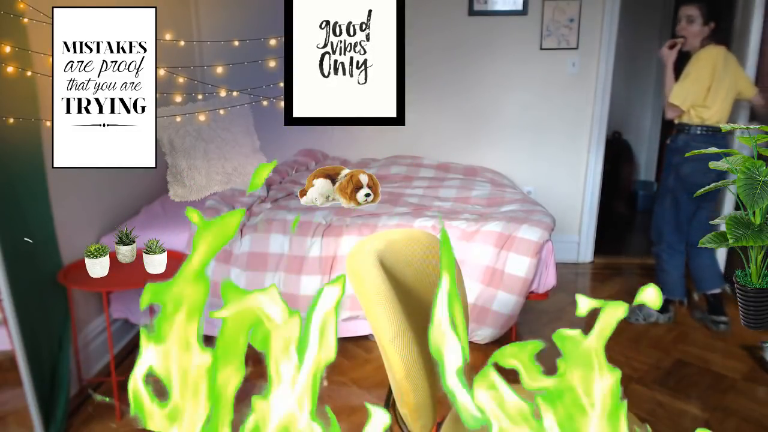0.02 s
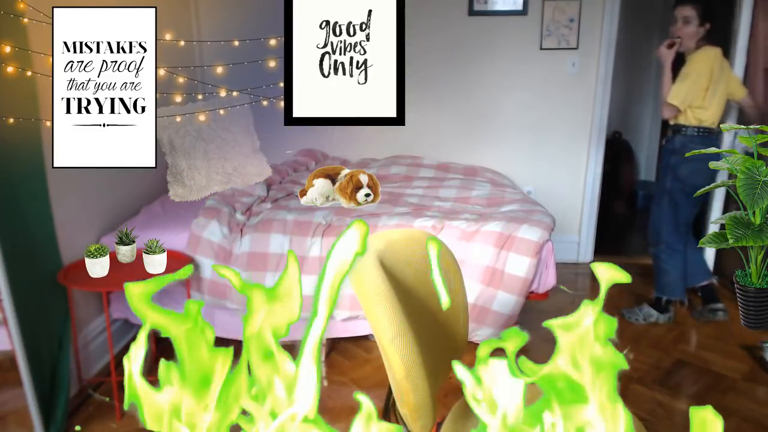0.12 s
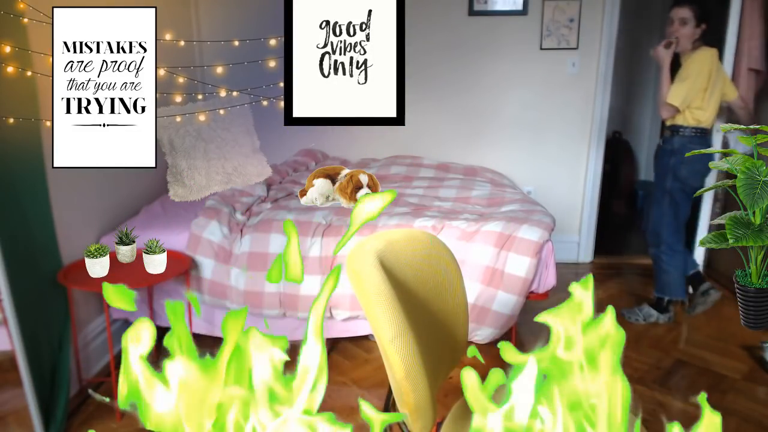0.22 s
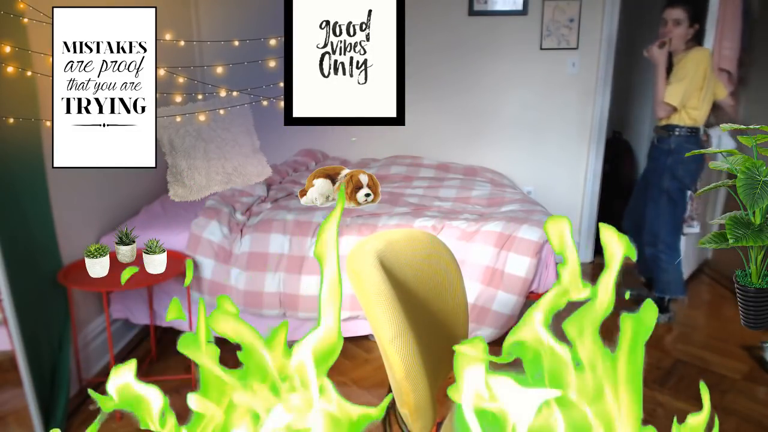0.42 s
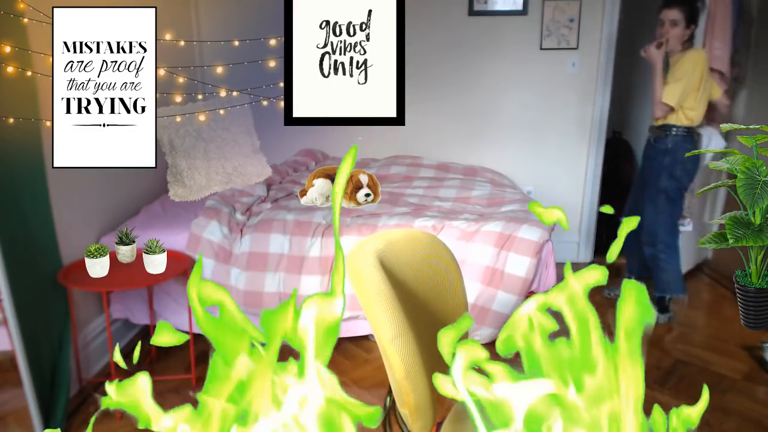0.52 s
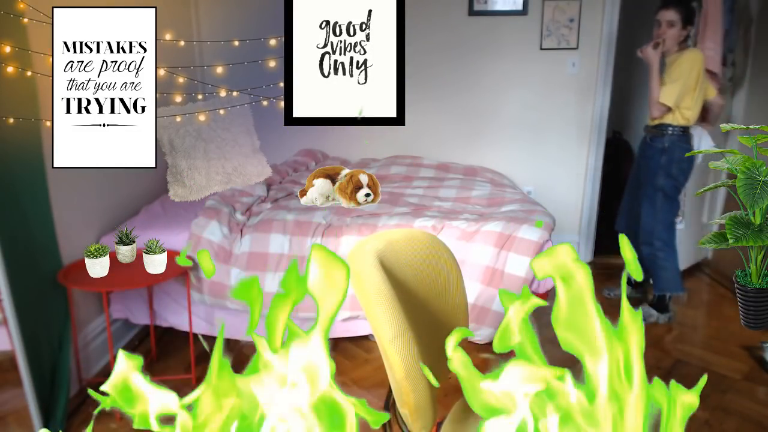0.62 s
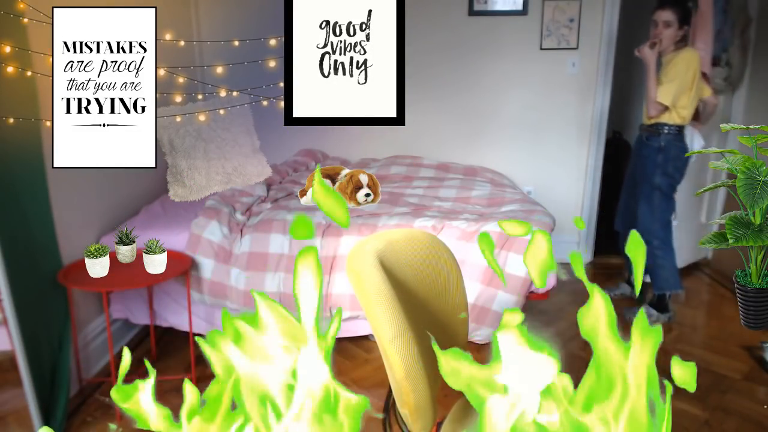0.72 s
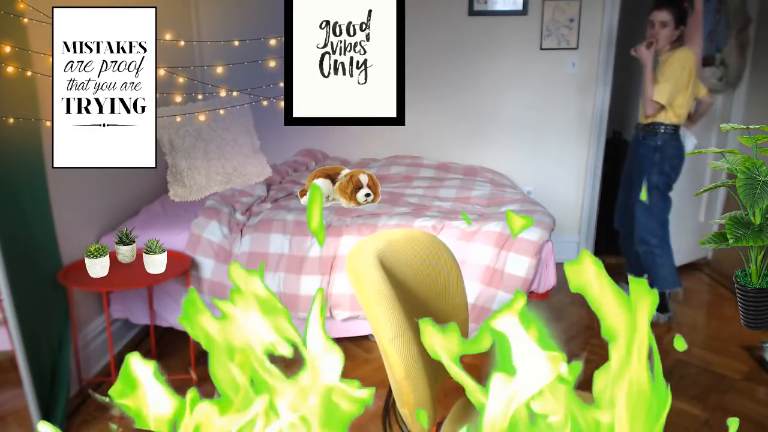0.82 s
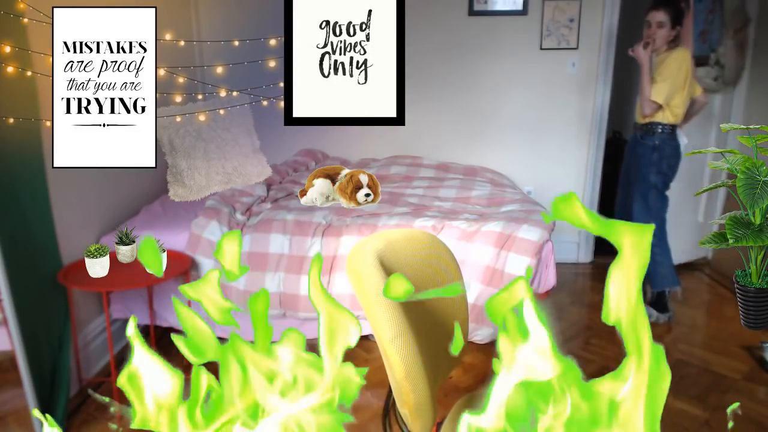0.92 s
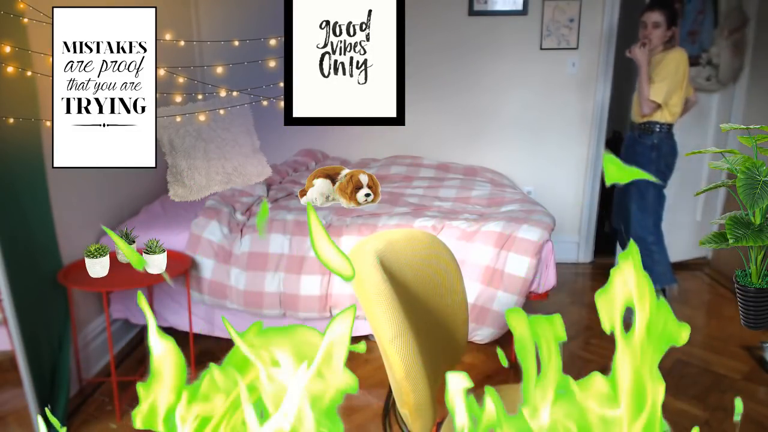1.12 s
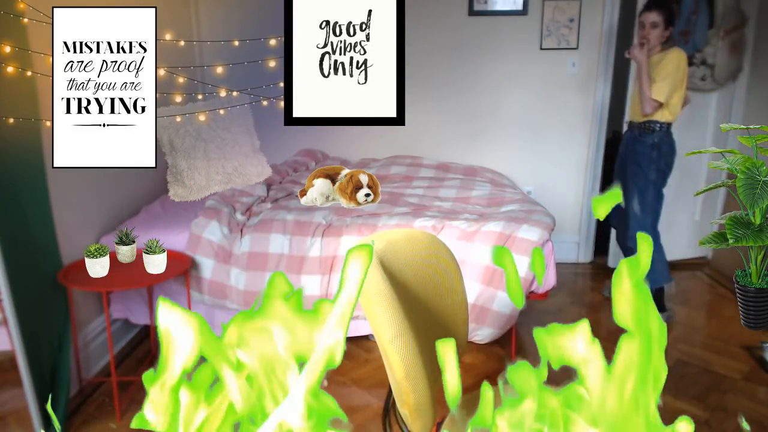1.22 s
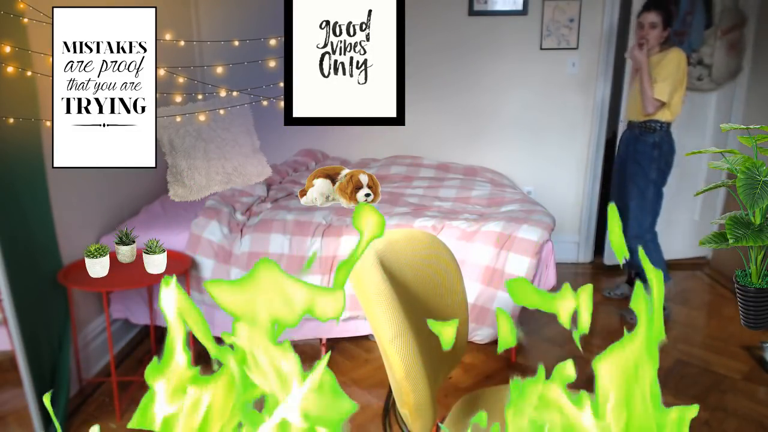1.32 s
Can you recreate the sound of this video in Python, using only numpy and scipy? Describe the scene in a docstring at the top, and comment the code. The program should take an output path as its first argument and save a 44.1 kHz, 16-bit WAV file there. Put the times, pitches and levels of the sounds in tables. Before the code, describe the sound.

A door being closed in a small room: a tiny squeak and hollow groan, a sharp latch clatter, a light swish, a juddering scrape, then a softer shutting clack, picked up close over faint low hum.

```python
"""Closing a door in a small room

A short squeak and a hollow groan, then a latch clatters, with a bright brush just before it snaps.
A light swish and a juddering scrape follow, and the door shuts with a clack; grainy tails hold briefly.
Soft bumps ring the floor, and a low room hum lies underneath. Blows ring tuned modes and shaped
echoes; rubbing sounds are rough noise that swells and fades through filters."""
import sys
import numpy as np
from scipy import signal
from scipy.fft import rfft, irfft
from scipy.io import wavfile

SR = 44100
rng = np.random.default_rng(int(sys.argv[2]) if len(sys.argv) > 2 else 0)


def wav_out(sig):
    """Save sig, one row per channel (or a flat mono array), as 16-bit PCM at SR to the path in sys.argv[1]."""
    wavfile.write(sys.argv[1], SR, np.round(np.clip(np.atleast_2d(sig).T, -1, 1) * 32767).astype(np.int16))


N = 61740  # samples, 1.4 s
T = np.arange(N) / SR  # s

# ways the latch metal can ring: f/Hz, level/dB (before a random factor), t60/s (time to fall 60 dB)
METAL_MODES = [(1712, -3.5, 0.1), (1922, -0.5, 0.15), (2034, -8, 0.23), (2350, -6, 0.083),
               (2492, 0.5, 0.13), (2550, 5, 0.12), (2680, -24, .25), (2775, -2, 0.13), (2740, -5, 0.16),
               (3280, -7, 0.095), (3455, -38, 0.12), (3990, -8.5, 0.15), (4980, 4, 0.067)]
# tone of a hard strike: f/Hz, level/dB per Hz
STRIKE_SPECTRUM = [(200, -58.5), (900, -14.5), (1600, -3), (2600, 1), (4600, -0.5), (6200, -3), (7500, 1),
                   (11000, 0), (15500, -1.5)]
CHATTER_S, CHATTER_DB = 0.0028, 4  # fade time; level against the first crack
CHATTER_GRIT = 0.77  # unevenness of the tiny contacts
BLOW_DIRECT = 0.36  # direct sound against the room's


def metal_ring():
    """Struck metal rings at several pitches at once, each fading at its own pace."""
    ring = 0
    for hz, db, t60 in METAL_MODES:
        fade = np.exp(-np.log(1000) * T / t60)
        ring = ring + undb(db) * fade * np.sin(2 * np.pi * hz * T) * rng.standard_normal()
    return unit(ring)


def clatter(hits, wood_spectrum, decay):
    """Each contact cracks and chatters, rings the latch metal and thumps the wooden leaf."""
    strike = colour(STRIKE_SPECTRUM)
    leaf = colour(wood_spectrum)
    out = 0
    for start, strike_db, metal_db, wood_db in hits:
        metal = metal_ring()
        tail = unit(grit(CHATTER_GRIT) * np.exp(-T / CHATTER_S))
        chatter = unit((T == 0) + undb(CHATTER_DB) * tail)
        contact = undb(strike_db) * through(chatter, strike) + undb(wood_db) * leaf
        # the metal ring is added without room echo
        sound = through(contact, room(BLOW_DIRECT, decay)) + undb(metal_db) * metal
        out = out + through(blows([start], [0]), sound)
    return out


# contacts of the latch: t/s, strike level/dB, metal ring level/dB, wood level/dB
LATCH_CONTACTS = [(.184, -46.5, -48, -62), (.194, -41, -74, -67), (.208, -48, -73, -83),
                  (.218, -39, -65, -69), (.222, -33.5, -64, -68), (.226, -31, -39, -55),
                  (.232, -29, -33, -39.5), (.240, -32, -41.5, -44), (.249, -33.5, -41, -52.5),
                  (.274, -40, -43.5, -50.5), (.294, -38.5, -42, -70), (.313, -53, -43.5, -73)]
# tone of the wood around the latch: f/Hz, level/dB per Hz
LATCH_WOOD_SPECTRUM = [(80, -35), (260, -13), (330, -20.5), (430, -6), (620, 1), (770, -0.5), (950, -11.5),
                       (1450, -7.5), (2500, -21.5), (8000, -44)]


def latch():
    """The latch clatters: a quick run of contacts between metal and wood."""
    return clatter(LATCH_CONTACTS, LATCH_WOOD_SPECTRUM, decay=0.89)


# contacts of the shutting door: t/s, strike level/dB, metal ring level/dB, wood level/dB
SHUT_CONTACTS = [(.950, -36, -42, -46), (.955, -40, -68, -52), (.9605, -34, -48, -53.5),
                 (.975, -44, -71, -78), (.987, -46, -60, -67), (1.003, -56, -56.5, -60.5),
                 (1.017, -56, -50.5, -59)]
# tone of the wood as the door shuts: f/Hz, level/dB per Hz
SHUT_WOOD_SPECTRUM = [(80, -27), (220, 3), (310, -14), (480, 7), (620, 3), (900, 3), (1400, 1.5),
                      (2500, -17.5), (8000, -45)]


def shut():
    """The door shuts with a clack, made of contacts close together."""
    return clatter(SHUT_CONTACTS, SHUT_WOOD_SPECTRUM, decay=0.7)


# grainy tails after the clacks: start t/s, hold length t/s, level/dB
TAIL_TIMES = [(.255, 0.057, -44), (0.98, 0.04, -51.5), (1.031, 0.024, -56)]
# tone of the grainy tails: f/Hz, level/dB per Hz
TAIL_SPECTRUM = [(200, -20), (700, -9.5), (1500, -2.5), (2000, 6), (2550, 9), (3200, -3.5), (5000, -10),
                 (6200, -20), (8000, -12), (15500, -21)]
TAIL_RISE_S, TAIL_FALL_S, TAIL_GRIT = 0.006, 0.0057, 0.97


def grainy_tails():
    """Very uneven noise holds briefly after the clacks, then drops away quickly."""
    level = 0
    for start, length, db in TAIL_TIMES:
        level = level + undb(db) * swell(start, TAIL_RISE_S, length, TAIL_FALL_S)
    grains = through(grit(TAIL_GRIT) * level, colour(TAIL_SPECTRUM))
    return through(grains, room(direct=2.0))


# resonances of the squeak: f/Hz, width f/Hz, level/dB
SQUEAK_RESONANCES = [(5120, 520, -7), (6810, 110, 2.5), (8320, 150, 0)]
SQUEAK_S, SQUEAK_DB = 0.1039, -47.5  # start; level
SQUEAK_RISE_S, SQUEAK_HOLD_S, SQUEAK_FALL_S = 0.02, 0.0071, 0.018


def squeak():
    """Friction noise excites a few narrow, high resonances: a short squeal."""
    rub = grit(0.46) * swell(SQUEAK_S, SQUEAK_RISE_S, SQUEAK_HOLD_S, SQUEAK_FALL_S)
    return undb(SQUEAK_DB) * through(rub, resonances(SQUEAK_RESONANCES))


# hollow groans of the turning mechanism: t/s, level/dB
GROAN_TIMES = [(.126, -45), (0.144, -47.5)]
# tone of the groan: f/Hz, level/dB per Hz
GROAN_SPECTRUM = [(150, -36), (430, -16.5), (560, -0.5), (700, 1), (880, -4.5), (1050, -17.5), (1280, -5.5),
                  (1550, -26.5), (2300, -15), (4900, -25), (6000, -47), (15000, -51)]
GROAN_RISE_S, GROAN_HOLD_S, GROAN_FALL_S = 0.0084, 0.008, 0.004


def groan():
    """The mechanism takes up its play: short efforts of rough noise with a hollow tone."""
    effort = 0
    for start, db in GROAN_TIMES:
        effort = effort + undb(db) * swell(start, GROAN_RISE_S, GROAN_HOLD_S, GROAN_FALL_S)
    return through(grit(0.53) * effort, colour(GROAN_SPECTRUM))


RUB_GRIT = 0.35  # unevenness of the swish and the scrape

# catches of the scrape: t/s, grit level/dB, wood level/dB
SCRAPE_CATCHES = [(0.543, -43.5, -55.5), (0.56, -44, -55), (.582, -46.5, -58), (0.602, -45, -56),
                  (0.616, -50, -69), (0.627, -45, -64), (0.646, -45, -62), (.666, -43.5, -66),
                  (.696, -48.5, -66), (0.705, -46, -71), (.728, -47.5, -71), (0.736, -45, -78),
                  (.752, -43, -58), (0.769, -44.5, -76), (0.786, -45, -68), (0.808, -45, -53),
                  (.833, -46, -52), (.872, -48, -66), (0.919, -50, -64)]
CATCH_RISE_S, CATCH_HOLD_S, CATCH_FALL_S = 0.004, 0.0049, 0.009


def bursts(column, lag=0):
    """Rough noise swelling at every catch; overlapping catches add by power."""
    power = 0
    for row in SCRAPE_CATCHES:
        shape = swell(row[0] + lag, CATCH_RISE_S, CATCH_HOLD_S, CATCH_FALL_S)
        power = power + (undb(row[column]) * shape) ** 2
    return grit(RUB_GRIT) * np.sqrt(power)


# tone of the scraping grit: f/Hz, level/dB per Hz
SCRAPE_SPECTRUM = [(80, -42), (450, -17), (850, -3.5), (1300, 0), (1800, -5), (2600, 3), (4600, 0.5),
                   (6100, -7.5), (7400, 4), (8600, 2), (11500, -2.5), (15500, -24.5)]
# resonances of the scraped surface: f/Hz, width f/Hz, level/dB
SURFACE_RESONANCES = [(1338, 70, 0.5), (3390, 170, -1.5), (5250, 250, 6), (7300, 380, 4), (9160, 410, 4)]
# hiss of each slip: f/Hz, level/dB per Hz
SLIDE_SPECTRUM = [(300, -46), (5000, -15), (8000, -15), (11500, 4), (14500, 3), (15800, -2.5)]
# tone of the wood behind the scrape: f/Hz, level/dB per Hz
SCRAPE_WOOD_SPECTRUM = [(100, -16), (260, -2.5), (380, -7.5), (520, -4), (850, 4), (1400, -11.5),
                        (4000, -14.5)]
SURFACE_DB, SLIDE_DB = -6, -5  # against the grit level of each catch
SLIDE_LAG_S = 0.0044  # the bright hiss of each slip comes just after the catch


def scrape():
    """Stick and slip: every catch rings the surface and the wood behind, then slides with a hiss."""
    rasp = through(bursts(1), colour(SCRAPE_SPECTRUM))
    surface = undb(SURFACE_DB) * through(bursts(1), resonances(SURFACE_RESONANCES))
    slide = undb(SLIDE_DB) * through(bursts(1, SLIDE_LAG_S), colour(SLIDE_SPECTRUM))
    wood = through(bursts(2), colour(SCRAPE_WOOD_SPECTRUM))
    return rasp + surface + slide + wood


# brushes, first the latch bolt just before it snaps, then a longer swish:
# start t/s, rise t/s, hold t/s, level/dB
BRUSHES = [(0.199, 0.021, 0.0033, -35.5), (0.422, 0.016, 0.064, -41)]
# bright tone of a brush: f/Hz, level/dB per Hz
SWISH_SPECTRUM = [(300, -47), (3000, -29), (6200, -17), (9000, -7.5), (13000, -3), (15500, -3)]
# fuller tone of a brush's body: f/Hz, level/dB per Hz
BODY_SPECTRUM = [(150, -15), (500, -11), (900, -3), (1700, -5.5), (3100, 1.5), (4800, 1), (6100, -12),
                 (8000, 3), (12000, -12.5)]
BRUSH_FALL_S = 0.0061
BODY_RISE_S, BODY_DB = 0.077, -8  # time to full body; full body against the bright part


def swish():
    """Light, bright sliding noise that gains body as it goes on."""
    out = 0
    for start, rise, hold, db in BRUSHES:
        touch = undb(db) * swell(start, rise, hold, BRUSH_FALL_S)
        press = undb(BODY_DB) * np.clip((T - start) / BODY_RISE_S, 0, 1)
        bright = through(grit(RUB_GRIT) * touch, colour(SWISH_SPECTRUM))
        body = through(grit(RUB_GRIT) * touch * press, colour(BODY_SPECTRUM))
        out = out + bright + body
    return out


# dull bumps through the floor: t/s, level/dB
BUMP_TIMES = [(0.15, -64), (.245, -68), (0.281, -65.5), (0.451, -62.5), (.565, -63), (.750, -62.5),
              (.812, -63.5), (.960, -60)]
# resonances of the floor, applied twice over: f/Hz, width f/Hz, level/dB
FLOOR_RESONANCES = [(118.6, 9.4, 0), (161.4, 29, 1), (259.6, 33, 2.5)]


def bumps():
    """Soft bumps set the floor ringing; resonating twice makes the onset gentle."""
    floor = resonances(FLOOR_RESONANCES)
    times, levels = zip(*BUMP_TIMES)
    return through(blows(times, levels), unit(through(floor, floor)))


# tone of the room hum: f/Hz, level/dB per Hz
HUM_SPECTRUM = [(25, -37), (34, -37), (43, -5.5), (57, -19.5), (85, -8.5), (120, 0), (210, -2.5), (280, -7),
                (380, -14.5), (730, -7.5), (1100, -19), (2400, -13.5), (4000, -22.5), (6000, -24),
                (10000, -21.5), (15000, -24.5)]
HUM_DB = -65.5


def hum():
    """Low room hum with faint hiss: steady noise with a shaped spectrum."""
    noise = rfft(rng.standard_normal(N))
    return undb(HUM_DB) * irfft(noise * rfft(colour(HUM_SPECTRUM), N), N)


# room echo, before the decay factor: f/Hz, t60/s (time to fall 60 dB)
ROOM_DECAY = [(150, 0.6), (600, 0.26), (2500, 0.32), (4800, 0.34), (7000, 0.23), (15000, 0.14)]
ROOM_BUILD_S = 0.00052  # time for the echo to build up


def room(direct, decay=1):
    """Direct sound and a dense tail with its own fading time in each band; the highest dies first."""
    noise = rfft(rng.choice([-1., 1.], N))
    hz = np.arange(N // 2 + 1) * SR / N
    tail = 0
    for k, (_, t60) in enumerate(ROOM_DECAY):
        # this band's share is 1 at its own frequency and 0 at the others
        share = on_log_axis(hz, [(f, j == k) for j, (f, _) in enumerate(ROOM_DECAY)])
        tail = tail + irfft(noise * share, N) * np.exp(-np.log(1000) * T / (t60 * decay))
    tail = unit(tail * (1 - np.exp(-T / ROOM_BUILD_S)))
    return unit(tail + direct * (T == 0))


def undb(db):
    """Decibels to gain."""
    return 10 ** (np.asarray(db) / 20)


def unit(h):
    """Scale a response to unit energy."""
    return h / np.sqrt(np.sum(h ** 2))


def through(x, h):
    """Pass a sound through a response."""
    return signal.fftconvolve(x, h)[:N]


def on_log_axis(hz, points):
    """Read a table of (Hz, value) at any frequency."""
    f, v = np.array(points, float).T
    return np.interp(np.log(np.maximum(hz, 1)), np.log(f), v)


def colour(points, size=8192):
    """Response with the given spectrum that starts at once (minimum phase, by way of the cepstrum)."""
    hz = np.arange(size // 2 + 1) * SR / size
    cepstrum = irfft(np.log(undb(on_log_axis(hz, points))))
    # fold the second half onto the first, so nothing sounds before time zero
    cepstrum[1:size // 2] *= 2
    cepstrum[size // 2 + 1:] = 0
    response = irfft(np.exp(rfft(cepstrum)))
    return unit(np.pad(response, (0, N - size)))


def resonances(rows):
    """Response of several resonances; a wider one fades faster."""
    total = 0
    for hz, width, db in rows:
        ring = np.exp(-np.pi * width * T) * np.sin(2 * np.pi * hz * T)
        total = total + undb(db) * unit(ring)
    return unit(total)


def blows(times, levels):
    """One impulse for each contact; its level is the average (rms) over 20 ms."""
    out = np.zeros(N)
    for start, db in zip(times, levels):
        out[int(start * SR)] += undb(db) * np.sqrt(0.02 * SR)
    return out


def swell(start, rise, hold, fall):
    """Attack, hold and exponential release."""
    attack = np.clip((T - start) / rise, 0, 1)
    return attack * np.exp(-np.maximum(T - start - rise - hold, 0) / fall)


def grit(rough):
    """Dense micro-contacts of uneven size, rms 1."""
    x = rng.standard_normal(N) * np.exp(rough * rng.standard_normal(N))
    return x / x.std()


def scene():
    """All sources in the room, one channel."""
    door = latch() + shut() + grainy_tails()
    turning = through(squeak() + groan(), room(direct=1.8))
    rubbing = through(scrape() + swish(), room(direct=1.5))
    return (door + turning + rubbing + bumps() + hum())[None]


def record(dry):
    """The recorder cuts the deepest bass (below 36 Hz) and the top (above 15800 Hz)."""
    thin = signal.sosfilt(signal.butter(6, 36, "high", fs=SR, output="sos"), dry)
    return signal.sosfilt(signal.ellip(10, .2, 70, 15800, fs=SR, output="sos"), thin)


dry = scene()
out = record(dry)
wav_out(out)
```